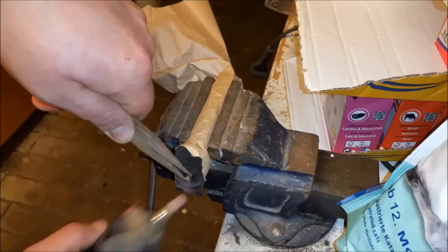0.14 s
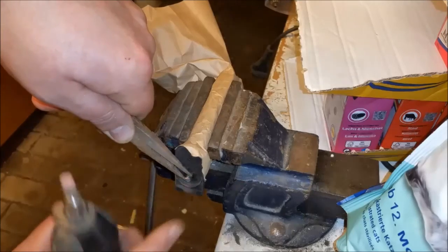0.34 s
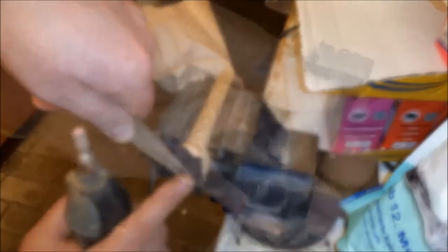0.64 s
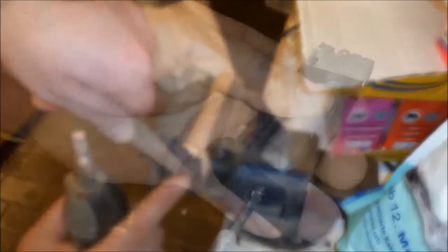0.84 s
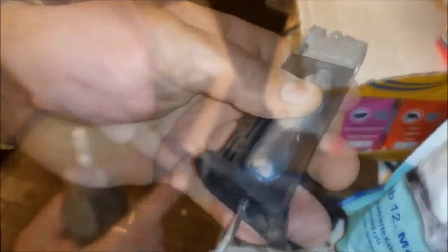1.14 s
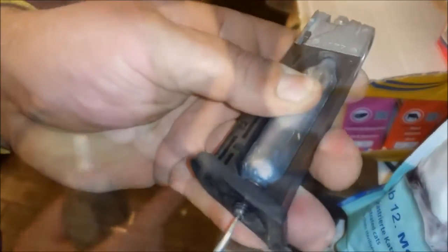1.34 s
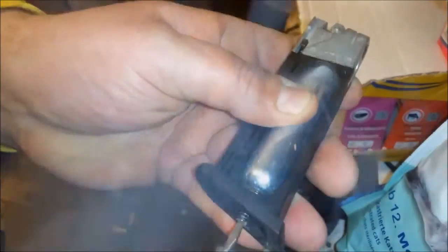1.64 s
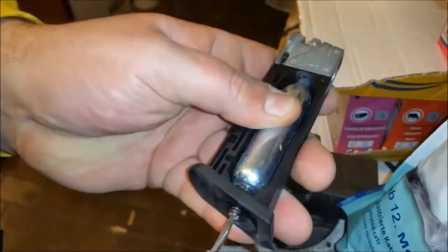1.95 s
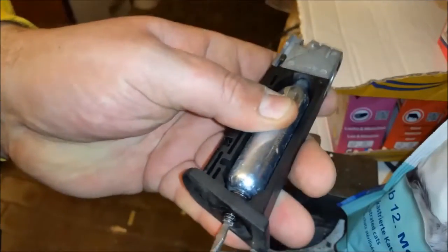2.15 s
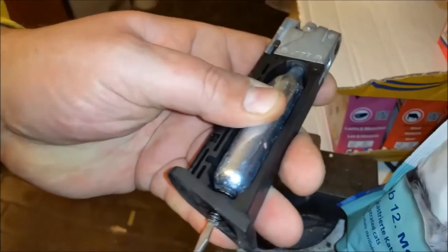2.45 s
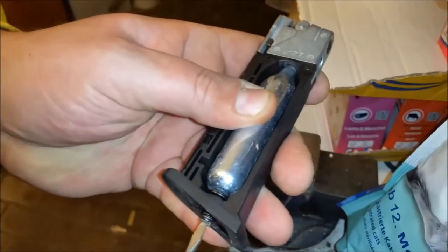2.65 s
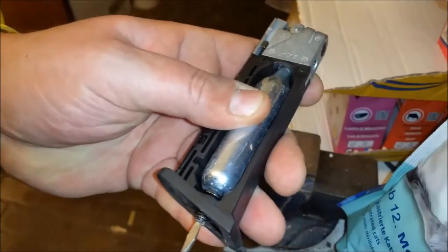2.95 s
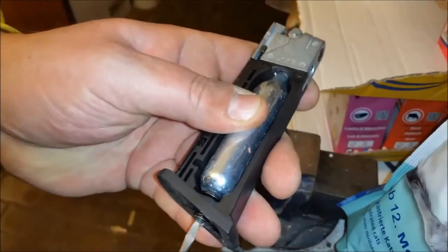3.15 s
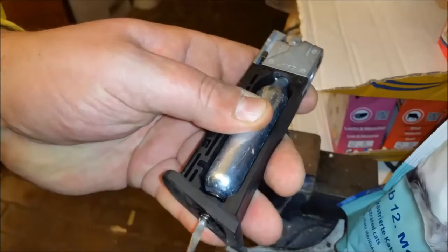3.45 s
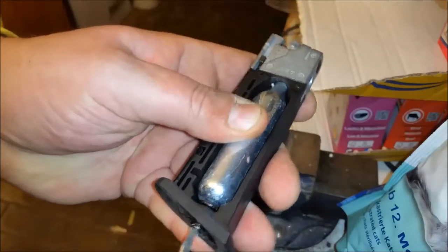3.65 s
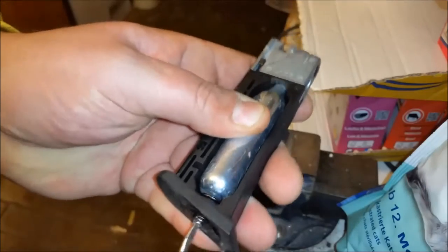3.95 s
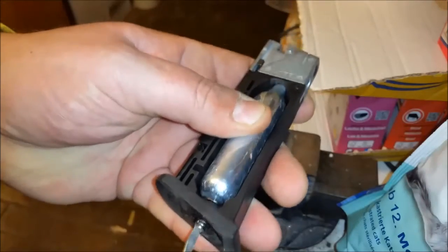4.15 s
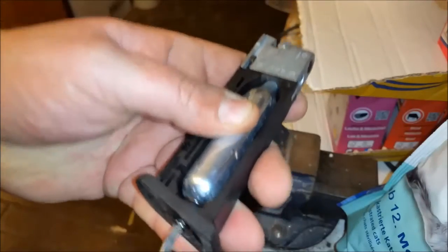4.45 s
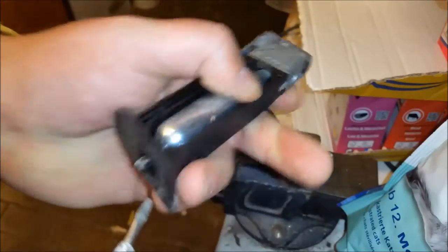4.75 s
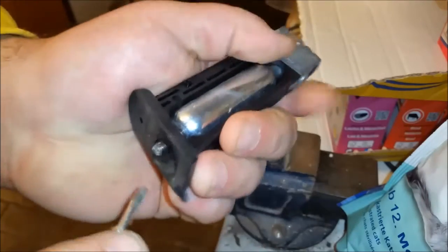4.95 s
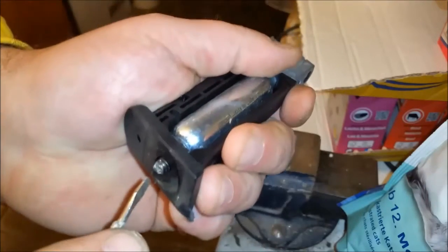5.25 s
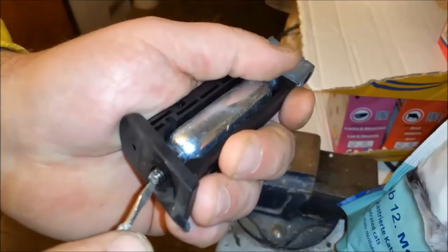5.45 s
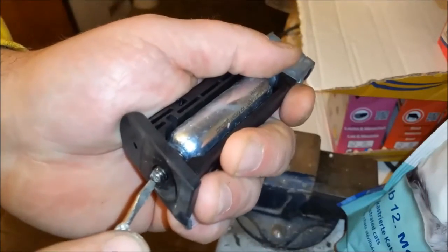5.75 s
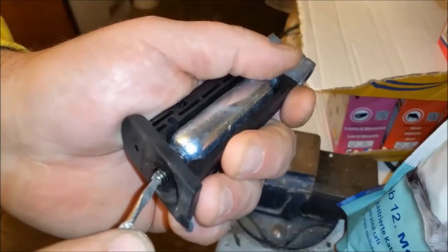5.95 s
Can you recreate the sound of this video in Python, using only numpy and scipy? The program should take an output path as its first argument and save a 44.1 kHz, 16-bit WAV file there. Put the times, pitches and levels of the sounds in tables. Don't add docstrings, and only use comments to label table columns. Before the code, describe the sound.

Buzzing handheld grinder fades away, cut off by a sharp wet gas blast that sputters down to nothing, followed by small metallic screwdriver clicks.

```python
import sys
import numpy as np
from scipy import signal
from scipy.fft import rfft, irfft, next_fast_len
from scipy.io import wavfile
from scipy.ndimage import map_coordinates

SR = 44100
rng = np.random.default_rng(int(sys.argv[2]) if len(sys.argv) > 2 else 0)


def gain_from_decibels(decibels):
    exponent = np.asarray(decibels, float) / 20
    return 10 ** exponent


def to_wav(sig):
    pcm = np.clip(np.atleast_2d(sig), -1, 1) * 32767
    pcm = np.round(pcm).astype(np.int16)
    wavfile.write(sys.argv[1], SR, pcm.T)


N = 268569
T = np.arange(N) / SR
START_DELAY_S = 0.0011
CUT_S = 1.59
BOTH_SIDES = gain_from_decibels([[1.5], [-1.5]])


def unit(x):
    return x / np.sqrt(np.mean(x ** 2) + 1e-20)


def noise():
    return rng.standard_normal(N)


def along(points, hz):
    f, v = np.transpose(points)
    return np.interp(np.log(hz + 1), np.log(f + 1), v)


def wobble(rate):
    return map_coordinates(rng.standard_normal(int(N * rate / SR) + 4), [T * rate])


def filtered(x, response):
    m = next_fast_len(N + 8192)
    return irfft(rfft(x, m) * response(np.fft.rfftfreq(m, 1 / SR)), m)[..., :N]


def coloured(x, spectrum):
    return unit(filtered(x, lambda hz: gain_from_decibels(along(spectrum, hz))))


def resonant(x, modes):
    def response(f):
        total = 0
        for k, (centre, width, db) in enumerate(modes):
            damping = 1j * f * width
            total = total + (-1) ** k * gain_from_decibels(db) * damping / (centre ** 2 - f ** 2 + damping)
        return total
    return filtered(x, response)


def crackle(per_second, spread_db, life_s):
    starts = (rng.random(N) < per_second / SR) * gain_from_decibels(spread_db * rng.random(N) ** 2)
    fade = signal.lfilter([1], [1, -np.exp(-1 / (life_s * SR))], starts)
    return unit(fade * noise())


def add(track, s, sound):
    part = track[..., round(s * SR):][..., :sound.shape[-1]]
    part += sound[..., :part.shape[-1]]


def scattered(pair):
    hz, _, z = signal.stft(pair, SR, nperseg=128)
    treble = (hz ** 2 / (hz ** 2 + 1200 ** 2))[:, None]
    scrambled = z * treble * np.exp(2j * np.pi * rng.random(z.shape))
    return signal.istft(scrambled, SR, nperseg=128)[1][:, :N]


# pitch_hz, t60_s
WALL_DECAY = [(200, 0.44), (2000, 0.32), (8000, 0.14), (16000, 0.033)]


def wall_tail(wet_db):
    length = SR // 5
    hz, s, z = signal.stft(rng.standard_normal((2, length)), SR, nperseg=256)
    decay = gain_from_decibels(-60 * s / along(WALL_DECAY, hz)[:, None])
    far = signal.istft(z * decay, SR, nperseg=256)[1][:, :length]
    return gain_from_decibels(wet_db) * far / np.linalg.norm(far[0])


def heard(x, pan_db, lag, wet_db, near_db):
    pair = x * gain_from_decibels(np.multiply.outer([.5, -.5], pan_db + 0 * T))
    echo, hop = np.zeros((2, N)), SR // 6
    padded = np.pad(pair, ((0, 0), (hop, 2 * hop)))
    for start in range(0, N + hop, hop):
        piece = padded[:, start:start + 2 * hop] * np.hanning(2 * hop)
        if piece.any():
            answer = signal.fftconvolve(piece, wall_tail(wet_db), axes=1)
            add(echo, max(start - hop, 0) / SR, answer[:, max(hop - start, 0):])

    def left_path(hz):
        body = gain_from_decibels(-2.5 / (1 + (hz / 900) ** 2))
        return body * np.exp(-2j * np.pi * hz * lag / SR)
    direct = np.array([filtered(pair[0], left_path), pair[1]])
    return direct + echo + gain_from_decibels(near_db) * scattered(pair)


# pitch_hz, level_db (per Hz)
ROOM_SPECTRUM = [(15, -46), (25, -16), (102, -8.5), (150, -11), (200, -18), (270, -10), (317, -17.5),
                 (363, -10), (476, -9.5), (531, -17), (641, -19), (818, -15), (1130, -24.5), (1560, -22.5),
                 (4030, -32), (8600, -34), (9000, -29.5), (12500, -32), (16000, -29)]
# pitch_hz, likeness (-1 to 1)
ROOM_LIKENESS = [(60, -0.42), (180, 0.48), (550, 0.14), (1650, -0.05), (4970, -0.02), (15000, -0.02)]
# pitch_hz, level_db (rms)
MACHINE_TONES = [(72, -88.5), (361, -90), (819, -82), (1620, -92), (9270, -95.5)]
# time_s, level_db
ROOM_GAIN = [(0, -5), (1.6, 4), (2.9, -3.5), (3.3, 4.5), (5, 4), (5.3, 2), (5.6, 3), (6.09, 5.5)]


def workshop():
    def half_angle(hz):
        return np.arccos(np.clip(along(ROOM_LIKENESS, hz), -1, 1)) / 2

    def mid_and_side(hz):
        return gain_from_decibels(along(ROOM_SPECTRUM, hz)) * [np.cos(half_angle(hz)), np.sin(half_angle(hz))]
    mid, side = filtered(rng.standard_normal((2, N)) * gain_from_decibels(.8 * wobble(10)), mid_and_side)
    air = gain_from_decibels(-72) * unit(np.array([mid + side, mid - side]))
    tones = np.zeros(N)
    for hz, db in MACHINE_TONES:
        tones += gain_from_decibels(db + 2 + 1.5 * wobble(5)) * np.sin(2 * np.pi * hz * T + .6 * wobble(11))
    return gain_from_decibels(np.interp(T, *np.transpose(ROOM_GAIN))) * (air + tones * BOTH_SIDES)


# start_s, pitch_hz, level_db, t60_s
CAMERA_BUMP = (5.94, 95, -60, .12)


def camera_bump():
    out, t = np.zeros(N), np.arange(SR // 8) / SR
    s, hz, db, t60 = CAMERA_BUMP
    add(out, s, gain_from_decibels(db - 60 * t / t60) * np.sin(2 * np.pi * hz * t))
    return out


# start_s, end_s, pitch_hz, width_hz, level_db
SEEPS = [
    (3.298, 3.898, 13400, 2480, -72.5),
    (4.776, 4.897, 10200, 450, -81.5),
    (5.74, 5.86, 10300, 450, -87),
]


def seep():
    out = np.zeros(N)
    for s0, s1, hz, width_hz, db in SEEPS:
        swell = np.sin(np.pi * np.clip((T - s0) / (s1 - s0), 0, 1))
        out += gain_from_decibels(db) * swell * unit(resonant(noise(), [(hz, width_hz, 0)]))
    return out


# start_s, level_db (peak), pitch_hz, grip_db, left_right_db
BLADE_TAPS = [(3.546, -59, 2510, -11, 14), (3.8214, -56, 2280, -11, 9), (3.8414, -57, 2780, -13.5, 14.5),
              (4.1056, -22.5, 3940, -9, 7), (4.2887, -58, 3700, -16, 2), (4.5825, -43, 2940, -15, 2),
              (4.5994, -47, 3600, -5.5, 11), (4.6204, -38, 4524, -6, 8), (4.6345, -52, 3160, 6, 0.5),
              (4.729, -36.5, 4240, -25, 8), (4.7507, -47, 4500, -20, 1.5), (4.9836, -53.5, 1830, -11.5, 11),
              (5.53, -46.5, 4110, -17, 11), (5.5375, -47, 4500, -10, 2.5), (5.5812, -48.5, 1870, -10, 10.5),
              (5.6534, -59.5, 1750, -8.5, 12), (5.7327, -46.5, 1890, -13, 12.5),
              (5.7615, -52, 4300, -8, 10), (5.8127, -57, 1590, -8.5, 4), (5.9484, -50, 2200, -14, 11.5),
              (6.0726, -57, 1910, -8.5, 15)]
# pitch_hz, level_db, t60_s
SHANK_RING = [(1040, -16, .03), (2720, -9, .03), (4180, -2, .025), (4610, -3, .02), (5640, -10, .02),
              (8990, -14, .015)]


def blade_taps():
    out, t = np.zeros(N), np.arange(SR // 20) / SR
    for s, db, hz, grip_db, _ in BLADE_TAPS:
        decay = gain_from_decibels(-60 * t / 0.0045) + gain_from_decibels(-15 - 60 * t / 0.063)
        crack = decay * rng.standard_normal((3, len(t)))
        crack[:, 0] = 3
        spot = signal.lfilter(*signal.iirpeak(hz, 1.7, SR), crack[0])
        edge = gain_from_decibels(-34) * np.diff(crack[1], prepend=0)
        dull = signal.lfilter(*signal.butter(1, 5000, fs=SR), crack[2])
        handle = signal.lfilter(*signal.butter(1, [700, 3500], "band", fs=SR), dull)
        grip = gain_from_decibels(grip_db + 12.5) * handle
        ring = np.zeros(len(t))
        for mode_hz, level, t60 in SHANK_RING:
            ring += gain_from_decibels(level + rng.normal(0, 3) - 60 * t / t60) * np.sin(2 * np.pi * mode_hz * t)
        ping = gain_from_decibels(-60 * t / 0.015) * np.sin(2 * np.pi * hz * t)
        add(out, s + START_DELAY_S, gain_from_decibels(db - 3.2) * (spot + edge + grip + .16 * ring + .12 * ping))
    return out


# start_s, level_db, swell_s (over 20 dB), hold_s, fade_s (over 20 dB)
SLIDES = [(3.58, -72.5, .03, .05, .2), (4.6, -58, .03, .035, 0.022), (4.731, -59, .025, .025, .05),
          (4.84, -73.5, 0.092, .004, .06), (4.93, -75, .2, .06, .2), (5.092, -75.5, .03, .004, 0.051),
          (5.531, -64, .004, .03, .06), (5.734, -63, .004, .03, .04), (5.95, -65, .005, .003, .02),
          (6.076, -67, .004, .03, .1)]
# pitch_hz, level_db (per Hz)
SLIDE_SPECTRUM = [(530, -12), (900, -11), (1310, -7), (1620, 2), (2730, -2), (4050, -5), (4980, -4.5),
                  (5960, -8), (8350, -11), (16000, -31.5)]
# pitch_hz, width_hz, level_db
BLADE_MODES = [(1880, 700, 0), (2760, 700, -2), (4150, 800, -1), (5600, 900, -3)]


def blade_rubbing():
    grit = crackle(2500, spread_db=7, life_s=0.001)
    grain = .9 * coloured(grit, SLIDE_SPECTRUM) + .3 * unit(resonant(grit[::-1], BLADE_MODES))
    strength = np.zeros(N)
    for s, db, swell_s, hold_s, fade_s in SLIDES:
        away = np.maximum((s - T) / swell_s, (T - s - hold_s) / fade_s)
        strength += gain_from_decibels(db - 2.5 - 20 * np.maximum(away, 0))
    return strength * grain


def screwdriver():
    pan_db = np.interp(T, [row[0] for row in BLADE_TAPS], [row[4] for row in BLADE_TAPS])
    return heard(blade_taps() + blade_rubbing(), pan_db - .6, lag=-9, wet_db=-10, near_db=2.5)


# pitch_hz, level_db (per Hz)
WIDE_GAP = [(1470, -15.5), (2500, -15.5), (2830, -20.5), (3600, -12.5), (3890, -15.5), (4170, -8),
            (5030, -11), (5690, -1.5), (6150, -11), (7420, 1), (9360, -1.5), (10200, -1.5), (13300, -5),
            (15200, -10), (16000, -37.5)]
# pitch_hz, level_db (per Hz)
NARROW_GAP = [(1470, -35), (2500, -16.5), (2620, -33), (3280, -20.5), (3980, -16), (4370, -8), (5150, -10),
              (6200, -4), (7020, -1.5), (7590, -4), (8600, -3), (9080, 0.5), (11200, -9.5), (12900, -4),
              (15200, -8.5), (16000, -23.5)]
# pitch_hz, width_hz, level_db
LEAK_CAVITIES = [(6950, 400, 0.5), (9120, 350, 1), (10400, 500, -7), (13000, 600, -4)]


def gas_jet(jet_db, wide):
    wet = np.clip(.25 + .1 * wobble(12), 0, 1)
    smooth = unit(gain_from_decibels(1.1 * wobble(70)) * noise())
    flow = np.sqrt(1 - wet) * smooth + np.sqrt(wet) * crackle(1500, spread_db=8, life_s=.0005)
    hiss = wide * coloured(flow, WIDE_GAP) + (1 - wide) * coloured(flow, NARROW_GAP)
    cavities = (.65 - .4 * wide) * unit(resonant(noise(), LEAK_CAVITIES))
    return gain_from_decibels(jet_db - 3.5) * (hiss + cavities)


# pitch_hz, level_db (per Hz)
ROAR_SPECTRUM = [(18, -62), (30, -32), (200, -12), (326, 0), (376, -6), (636, -2.5), (3900, -4),
                 (5720, -15), (6140, -57.5), (7090, -9.5), (9000, -11), (11700, -34.5), (19800, -120)]
# time_s (middle), level_db, half_length_s
LIQUID_SLUGS = [
    (1.655, -36.5, 0.037),
    (1.744, -28, 0.029),
    (1.895, -46, 0.026),
    (2.641, -54, 0.01),
    (2.71, -56, 0.012),
    (2.902, -67, .04),
]


def gas_roar(jet_db):
    slugs = sum(gain_from_decibels(db) * np.exp(-((T - s) / half_s) ** 2) for s, db, half_s in LIQUID_SLUGS)
    lumps = noise() + .8 * crackle(700, spread_db=9, life_s=.001)
    return (gain_from_decibels(jet_db - 10.5) + slugs) * gain_from_decibels(-7.5) * coloured(lumps, ROAR_SPECTRUM)


# start_s, level_db (peak), low_pop_db
POPPING_DROPLETS = [(1.6008, -21, -25), (1.6118, -25, -15), (1.7425, -22, -9), (1.8034, -15.5, -15),
                    (1.8308, -20, -28), (1.8403, -19, -26), (1.8507, -17, -26), (1.8802, -19, -6),
                    (1.9351, -28, -24), (1.961, -25, -26), (2.0288, -28, -24), (2.0742, -25, -25),
                    (2.1072, -29, -22), (2.1271, -32, -20), (2.1546, -29, -26), (2.5801, -33, -28),
                    (2.6355, -22, -26), (2.6445, -28, -26), (2.6953, -29, -26), (2.7103, -27.5, -24),
                    (2.8889, -29, -26), (3.0031, -29, -26), (3.0405, -29, -28), (3.079, -26, -28),
                    (3.1009, -26, -28), (3.1194, -25.5, -28), (3.1483, -26, -28), (3.1593, -26, -28),
                    (3.1688, -24, -30), (3.2311, -25, -30)]
# start_s, level_db (peak)
SNAPPING_DROPLETS = [(1.6538, -14), (1.66, -14), (1.7294, -12), (1.7384, -14), (1.7702, -16), (1.7808, -16),
                     (1.8566, -19), (1.8615, -21), (1.8713, -20), (1.9159, -28), (1.9384, -28), (1.9751, -29),
                     (2.0335, -29), (2.0409, -31), (2.0482, -30), (2.0617, -32), (2.0895, -35), (2.1006, -36),
                     (2.1144, -36), (2.1207, -37), (2.141, -38), (2.1449, -37), (2.1983, -37), (2.3322, -39),
                     (2.34, -41), (2.3836, -39), (2.423, -36), (2.4419, -37), (2.4657, -34), (2.5043, -38),
                     (2.5509, -36), (2.6591, -30), (2.6672, -33), (2.7149, -30), (2.727, -36), (2.7608, -36),
                     (2.8029, -34), (2.8432, -31), (2.8812, -36), (2.899, -36), (2.9089, -35), (2.9832, -34),
                     (3.0074, -28), (3.0462, -30), (3.0499, -30), (3.0817, -26), (3.0877, -29), (3.1339, -28),
                     (3.1872, -26), (3.2234, -30), (3.2459, -32), (3.3075, -39), (3.3148, -42), (3.3231, -41),
                     (3.3287, -42)]


def droplets(jet_db):
    low_pop_db = -29
    spits = [*POPPING_DROPLETS, *[(s, db - 1, low_pop_db) for s, db in SNAPPING_DROPLETS]]
    for chance, size in rng.random((25, 2)):
        s = 1.8 + 1.5 * chance
        spits.append((s, np.interp(s, T, jet_db) + 8 + 8 * (size - .5), low_pop_db))
    pops, t = np.zeros((2, N)), np.arange(200) / SR
    for s, db, low_db in spits:
        spray = .25 * rng.standard_normal(len(t)) * gain_from_decibels(-60 * t / 0.004)
        burst = (t < 1 / SR) + spray
        add(pops, s + START_DELAY_S, gain_from_decibels([[db + 11], [db + low_db + 21]]) * burst)
    snap = resonant(pops[0], [(8500, 6000, 0)])
    thump = resonant(pops[1], [(1300, 3000, 0)])
    return snap + thump


def port_buffeting():
    blast = np.interp(T, [1.6, 1.65, 1.78, 1.88], [0, 1, 1, 0])
    spectrum = [(20, -12.5), (70, -2), (180, -1), (400, -32), (800, -90)]  # pitch_hz, level_db
    return gain_from_decibels(-63) * blast * coloured(rng.standard_normal((2, N)), spectrum)


# time_s, level_db
GAS_FLOW = [(1.6, -35), (1.65, -25.5), (1.7, -26), (1.73, -25), (1.765, -26), (1.795, -33.5), (1.82, -33),
            (1.86, -30.5), (1.91, -40.5), (2.03, -43), (2.13, -48), (2.37, -51), (2.62, -47.5), (2.66, -49),
            (2.91, -47), (2.945, -49.5), (3.08, -42.5), (3.24, -43), (3.285, -50), (3.335, -52.5),
            (3.37, -70)]
GAP_CHOKES = [2.135, 2.258, 2.375, 2.572, 2.768]


def gas():
    trickle_end_s = 3.8
    s, db = np.transpose([*GAS_FLOW, (trickle_end_s, -78)])
    gate = np.interp(T, [s[0] - 1 / SR, s[0], s[-1], s[-1] + .2], [0, 1, 1, 0])
    chokes = sum(np.exp(-((T - choke_s) / .008) ** 2) for choke_s in GAP_CHOKES)
    jet_db = np.interp(T, s, db) + .8 * wobble(25) - 8 * chokes
    wide = np.interp(T, [1.95, 2.2], [1, 0])
    spit = droplets(jet_db)
    direct = gain_from_decibels([[1.5], [-2.5]]) * np.array([np.roll(spit, -5), spit])
    source = gate * (gas_jet(jet_db, wide) + gas_roar(jet_db)) + .25 * spit
    pan_db = 2.5 * wide + 4 * (1 - wide)
    return port_buffeting() + direct + heard(source, pan_db, lag=-5, wet_db=-7, near_db=5)


# order (multiple of the shaft), roughness_rad, level_db, facing_db (extra, facing the camera)
SHAFT_ORDERS = [
    (1, .8, -63.5, 0),
    (2, .8, -56, 0),
    (8, 1.6, -59.5, 0),
    (16, .9, -62, 11),
    (24, 1.2, -63, 1),
    (32, .7, -58.5, -1),
]


def shaft_whine(turn, fade_db):
    facing = 1 / (1 + (T / .33) ** 4)
    whine = np.zeros(N)
    for order, rough, db, facing_db in SHAFT_ORDERS:
        level_db = db + fade_db + facing_db * facing + 3 + 2.5 * wobble(30)
        whine += gain_from_decibels(level_db) * np.sin(order * turn + rough * wobble(80))
    return whine


# pitch_hz, level_db (per Hz)
CASING_SPECTRUM = [(59, -42), (100, -37.5), (309, -26.5), (347, -6.5), (400, -10), (455, -5.5),
                   (522, -13.5), (679, 0), (911, -7.5), (1070, 0), (1640, -8), (1900, -9.5), (2730, -7),
                   (3550, -18.5), (5000, -17), (6500, -46), (11000, -120)]
# pitch_hz, width_hz, level_db
CASING_MODES = [(695, 37, -6.5), (1260, 210, -0.5), (1982, 100, 1.5), (2850, 300, -7), (5500, 65, -10.5),
                (6600, 49, -21), (8500, 77, -20.5)]
# pitch_hz, level_db (per Hz)
FAN_SPECTRUM = [(2060, -30), (3500, -7), (4970, -4.5), (5670, -2), (7180, -12), (8050, -4.5), (9200, -12),
                (11100, -6), (12200, -13), (14300, -12.5), (16000, -29.5)]


def casing_and_fan(turn, fade_db):
    lift_db = 5 * np.exp(-T / .1)
    retreat_db = 5 * np.exp(-T / .47)
    throb = (1 + .3 * np.sin(2 * np.pi * 100 * T)) * (1 + .34 * np.sin(turn)) * gain_from_decibels(1.5 * wobble(40))
    rough = noise() + .5 * crackle(250, spread_db=9, life_s=0.0016)
    body = coloured(throb * rough, CASING_SPECTRUM)
    buzz = unit(resonant(throb * noise(), CASING_MODES))
    air = coloured(throb * noise(), FAN_SPECTRUM)
    casing = gain_from_decibels(-44.5 + fade_db + lift_db) * (.8 * body + .36 * buzz)
    return casing + gain_from_decibels(-50.5 + fade_db + lift_db + retreat_db) * air


# start_s, level_db (peak), t60_s
STONE_BOUNCES = [
    (0.001, -19, 0.081),
    (0.036, -20.5, 0.074),
    (0.0725, -15, 0.11),
    (0.099, -23, 0.066),
    (0.132, -20.5, 0.046),
]
# pitch_hz, level_db (per Hz)
CUTTING_SPECTRUM = [(59, -54.5), (100, -43), (156, -11), (358, -16), (583, -9), (662, -17), (854, -17.5),
                    (1450, 1.5), (1650, -7), (2630, -12), (3190, -14), (9410, -9), (16000, -22.5)]
# pitch_hz, width_hz, level_db
BIT_MODES = [(1464, 250, 3), (2990, 400, -6), (7500, 1500, -20)]


def stone_on_steel():
    contact, strikes, t = np.zeros(N), np.zeros(N), np.arange(SR // 10) / SR
    for s, db, t60 in STONE_BOUNCES:
        add(contact, s, gain_from_decibels(db - 8.5 - 60 * t / min(t60, .055)) * (1 - np.exp(-t / 0.0026)))
        add(strikes, s, gain_from_decibels(db + 4 - 60 * t / .008) * rng.standard_normal(len(t)))
    grind = contact * coloured(crackle(3000, spread_db=8.5, life_s=0.00082), CUTTING_SPECTRUM)
    return grind + resonant(strikes, BIT_MODES)


# start_s, level_db (peak)
ARMATURE_KNOCKS = [(0.1755, -33), (0.1967, -35), (0.2094, -35), (0.2249, -34), (0.2562, -35), (0.2668, -35),
                   (0.2949, -33), (0.335, -34), (0.3457, -32), (0.3693, -35), (0.4171, -35), (0.4271, -33),
                   (0.4454, -33), (0.4651, -35), (0.4769, -32), (0.4878, -34), (0.496, -29), (0.5264, -33),
                   (0.5463, -30), (0.5778, -34), (0.6071, -32), (0.6269, -27), (0.635, -34), (0.647, -35),
                   (0.6532, -35), (0.6671, -31), (0.6868, -30), (0.6924, -34), (0.7672, -33), (0.7741, -35),
                   (0.8177, -35), (0.8479, -32), (0.868, -33), (0.8729, -35), (0.8868, -35), (0.9664, -34),
                   (0.9857, -33), (1.0182, -35), (1.0291, -31), (1.048, -34), (1.0569, -32), (1.0677, -35),
                   (1.0774, -35), (1.0866, -33), (1.1168, -34), (1.1363, -35), (1.1981, -35), (1.2161, -35),
                   (1.2357, -34), (1.3272, -32), (1.3872, -32), (1.3931, -35), (1.4082, -34), (1.4674, -35),
                   (1.5075, -33), (1.5167, -33), (1.5373, -31), (1.5593, -34)]
# pitch_hz, width_hz, level_db
KNOCK_MODES = [(740, 260, 0), (1180, 350, 0), (2000, 500, -13), (2760, 500, -9)]


def armature_knocks(fade_db):
    blows, t = np.zeros(N), np.arange(SR // 10) / SR
    knocks = [(s - .0007, db) for s, db in ARMATURE_KNOCKS]
    for half_cycle in range(160):
        knocks.append((half_cycle / 100 + .0058, -40 + 3 * rng.standard_normal()))
    for s, db in knocks:
        push = .3 * rng.standard_normal(len(t)) + 4 * (t < 1 / SR)
        add(blows, s, gain_from_decibels(db + 20.5 - 60 * t / .005) * push)
    return gain_from_decibels(fade_db) * resonant(blows, KNOCK_MODES)


def tool():
    free_hz, loaded_hz, lift_off_s, spin_up_s = 353.5, 341.2, .19, .88
    pan_db, lag = 2, -13.5
    gate = np.clip((CUT_S - T) / 0.0048 + 1, 0, 1)
    fade_db = 20 * np.log10(np.clip(1 - T / 1.85, 1e-3, 1))
    slowed = np.exp(-np.maximum(T - lift_off_s, 0) / spin_up_s)
    turn = 2 * np.pi * np.cumsum(free_hz - (free_hz - loaded_hz) * slowed) / SR
    whine = shaft_whine(turn, fade_db) * BOTH_SIDES
    running = casing_and_fan(turn, fade_db) + stone_on_steel()
    motor = heard(running, pan_db, lag, wet_db=-1.5, near_db=6)
    knocks = heard(armature_knocks(fade_db), pan_db, lag, wet_db=-9, near_db=-3)
    return gate * (whine + motor + knocks)


def scene():
    return workshop() + camera_bump() + seep() + screwdriver() + gas() + tool()


def roll_off(x):
    return signal.sosfilt(signal.butter(12, 16640, fs=SR, output="sos"), x)


def record(dry):
    top_hz = 15850
    mix = filtered(dry, lambda hz: hz < top_hz)
    return roll_off(mix)


dry = scene()
out = record(dry)
to_wav(out)
```